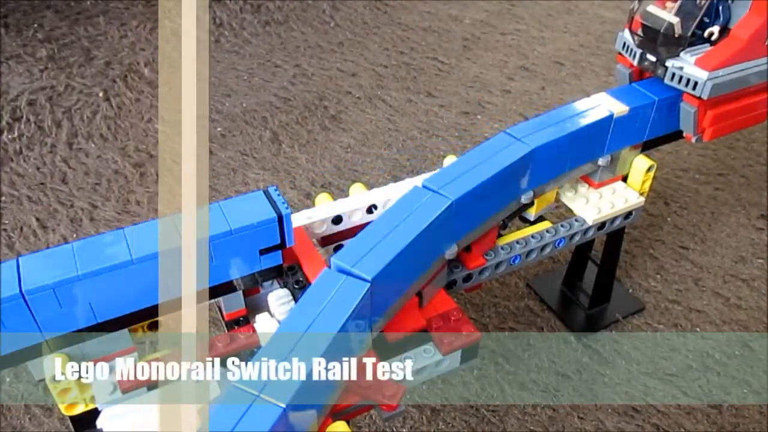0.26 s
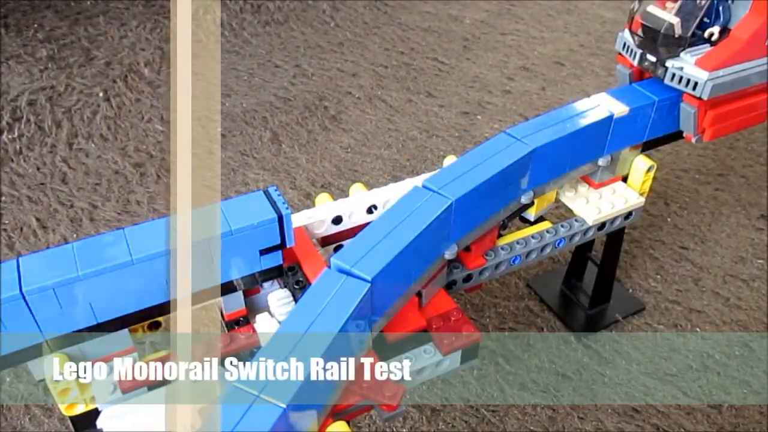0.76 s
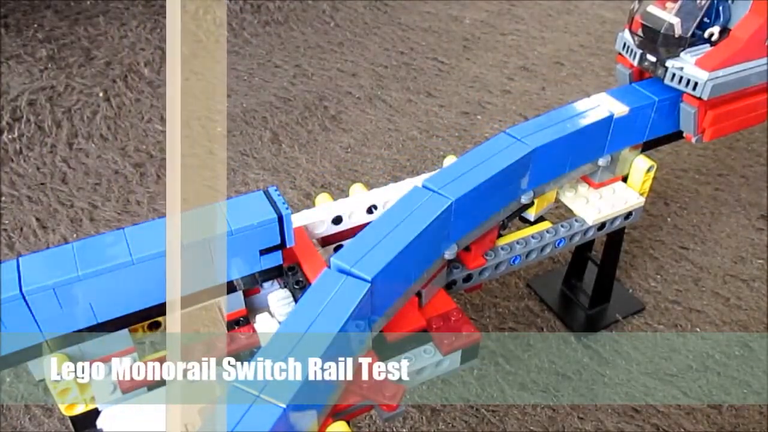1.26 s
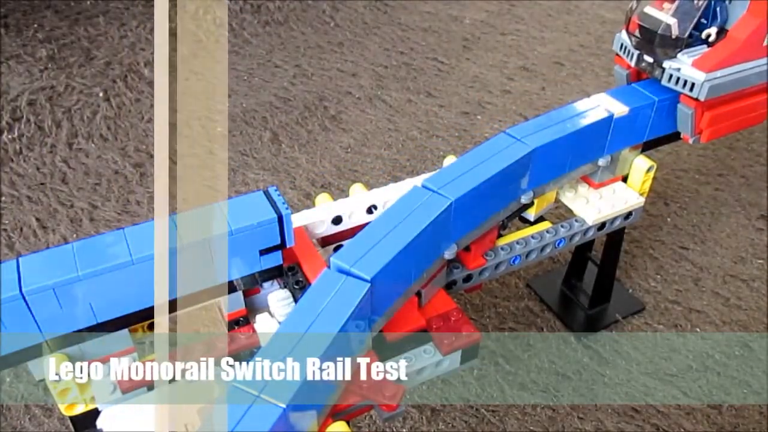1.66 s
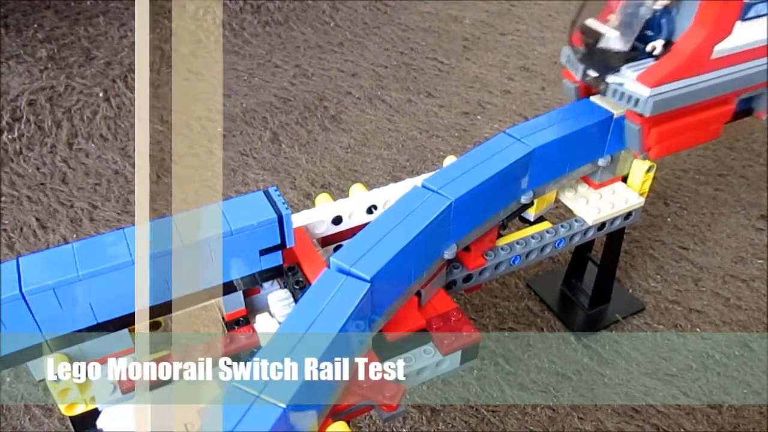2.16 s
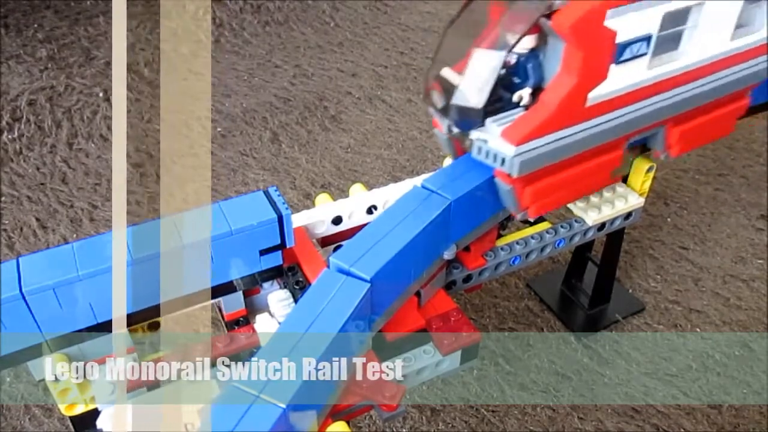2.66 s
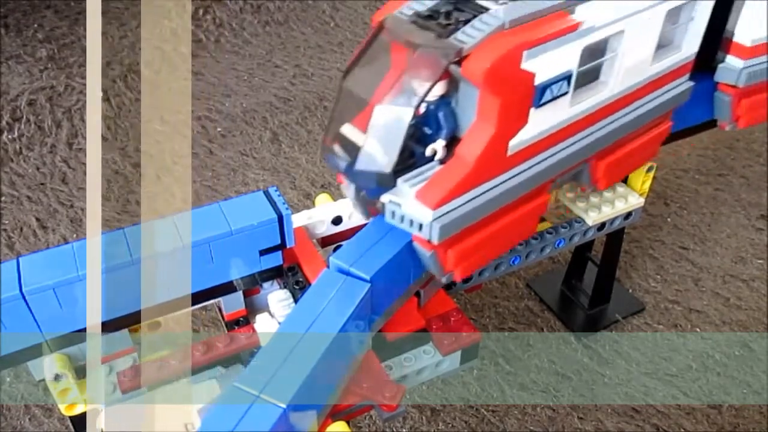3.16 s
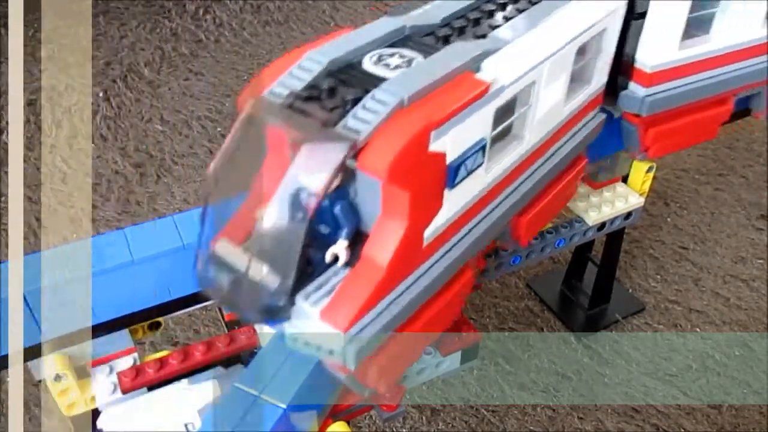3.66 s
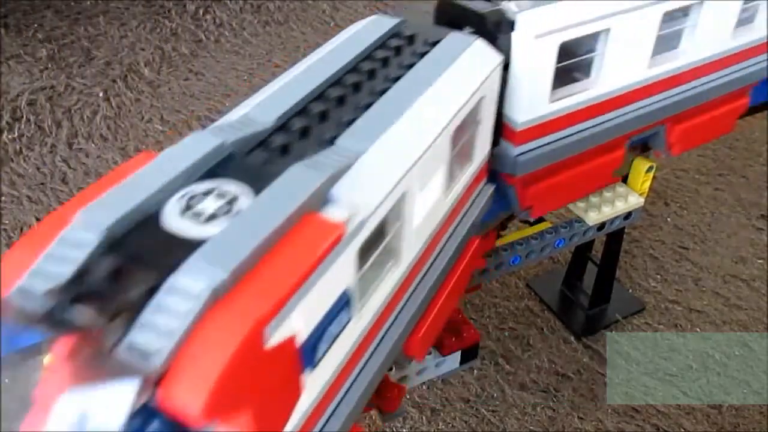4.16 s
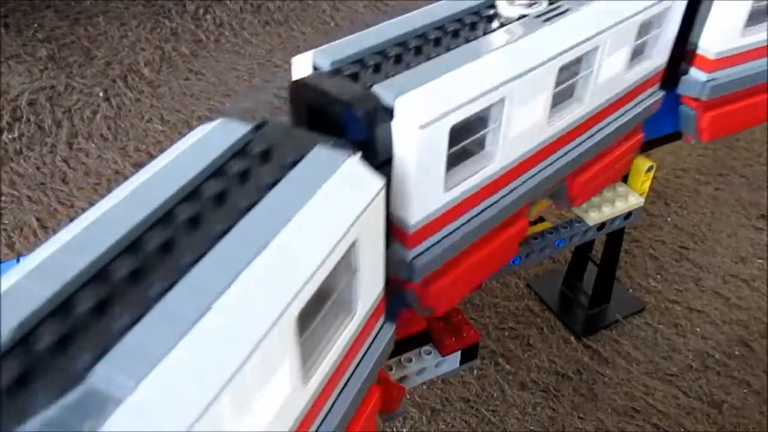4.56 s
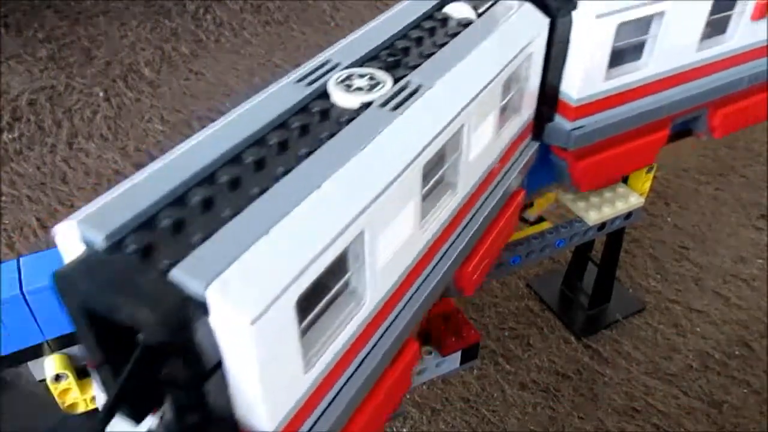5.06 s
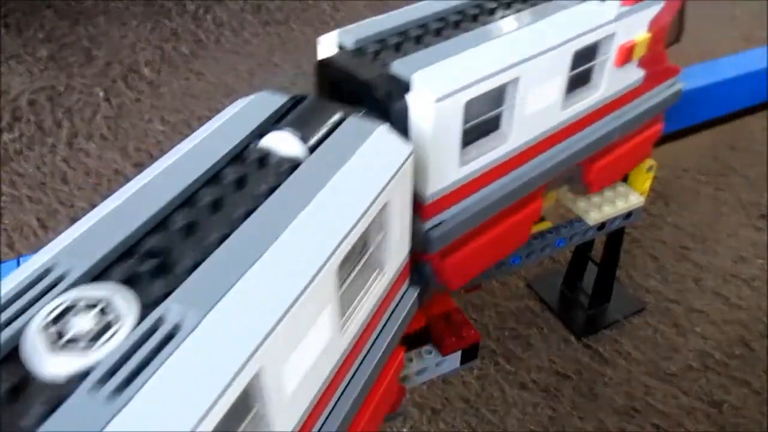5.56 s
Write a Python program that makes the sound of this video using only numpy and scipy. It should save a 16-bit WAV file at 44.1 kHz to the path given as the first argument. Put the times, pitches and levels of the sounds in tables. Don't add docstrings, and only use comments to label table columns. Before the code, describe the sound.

Brief whirring rundown and ticking gear teeth, near silence, then a plastic toy train strains, whines and rattles along a toothed track indoors.

```python
import sys
import numpy as np
from scipy import signal
from scipy.io import wavfile
from scipy.ndimage import map_coordinates

SR = 44100
rng = np.random.default_rng(int(sys.argv[2]) if len(sys.argv) > 2 else 0)


def volts_from_db(level):
    exponent = np.asarray(level, float) / 20
    return 10 ** exponent


def transcribe(u):
    v = np.clip(np.atleast_2d(u).T, -1, 1)
    q = np.round(v * 32767).astype(np.int16)
    wavfile.write(sys.argv[1], SR, q)


N = 256220


def rms_one(x):
    return x / np.sqrt(np.mean(x ** 2) + 1e-20)


def in_time(rows):
    s, *columns = np.transpose(rows)
    t = np.arange(N) / SR
    gate = np.interp(t, [s[0] - .004, s[0], s[-1], s[-1] + .02], [0, 1, 1, 0])
    return [np.interp(t, s, column) for column in columns] + [gate]


def at_hz(points, hz):
    points = np.array(points)
    return np.interp(np.log(hz), np.log(points[:, 0] + 1), points[:, 1])


def drift(rate):
    r = np.exp(-80 * np.pi * rate / SR)
    slow = signal.lfilter([1], [1, -2 * r, r * r], rng.standard_normal(N // 40 + 2002))[2000:]
    return np.interp(np.arange(N) / 40, np.arange(len(slow)), rms_one(slow))


def resonate(x, hz, width_hz):
    r = np.exp(-np.pi * width_hz / SR)
    poles = [1, -2 * r * np.cos(2 * np.pi * hz / SR), r * r]
    return signal.lfilter([(1 - r * r) / 2, 0, (r * r - 1) / 2], poles, x)


def contacts(per_s, spread_db, fade_s, slide):
    sizes = volts_from_db(spread_db * np.minimum(rng.exponential(1, N), 4))
    sizes = sizes * (rng.random(N) < per_s / SR)
    bursts = signal.lfilter([1], [1, -np.exp(-1 / (fade_s * SR))], sizes + 1e-18)
    return rng.standard_normal((2, 2, N)) * (rms_one(bursts) + slide)


def coloured(noises, spectrum, likeness, patchy_db):
    low_hz, high_hz = spectrum[0][0], spectrum[-1][0]
    edges = low_hz * 2 ** np.arange(0, np.log2(high_hz / low_hz) + .3, 1 / 3)
    out = 0
    for k, (low, high) in enumerate(zip(edges, edges[1:])):
        band = signal.butter(2, [low, high], "band", fs=SR, output="sos")
        mid, side = signal.sosfilt(band, noises[k % 2])
        hz = np.sqrt(low * high)
        alike = np.clip(at_hz(likeness, hz), -1, 1)
        gain = volts_from_db(at_hz(spectrum, hz) + patchy_db * drift(6.8)[:len(mid)])
        out = out + gain * (np.sqrt(1 + alike) * mid + np.sqrt(1 - alike) * side * [[1], [-1]])
    return rms_one(out)


def placed(pair, pan_db, lag_per_db):
    late = map_coordinates(pair[0], [np.arange(N) + lag_per_db * pan_db], order=3)
    return np.array([late * volts_from_db(pan_db / 2), pair[1] * volts_from_db(-pan_db / 2)])


# start in seconds, drumming level in dB, slack of the couplings in dB, left-right in dB.
TRAIN = [(1.46, -58, 2, -4.5), (1.53, -54, -2, -4.5), (1.6, -64, 7, -4), (1.7, -63, 7, -4.5),
         (1.76, -53, -1.5, -4.5), (1.92, -51.5, -4.5, -4), (2.026, -45, -2, -4.5), (2.22, -43, 1.5, -4),
         (2.57, -40.5, 0, -3.5), (2.9, -45.5, 0.5, -3.5), (3.1, -41.5, -1.5, -3), (3.56, -40, -0.5, -2),
         (4.05, -37, 2, -2), (4.32, -34.5, 2, 0), (4.67, -34.5, -3, .5), (4.91, -35, -2.5, .5),
         (5.3, -34.5, 1.5, 0), (5.81, -33, 3, .5)]
# start in seconds, level in dB.
FRAME_SWELLS = [(2.0, 0), (2.25, 2), (2.55, -1), (2.8, 2), (3.0, -1), (3.15, 1.5), (3.4, -3.5), (3.6, -1),
                (3.8, 1)]
# frequency in Hz, level in dB per Hz.
BODY = [(590, -60), (1000, -41), (1090, -29), (1150, -7.5), (1310, 3), (2030, -12), (2280, -1), (3000, -34),
        (3900, -52), (6600, -120)]
FRAME = [(180, -37), (300, -10.5), (494, 2.5), (690, -1), (795, -1), (1050, -1), (1360, -30), (2310, -120)]
RATTLE = [(1530, -7), (2600, -14.5), (2850, -6), (4730, -6.5), (5460, -1.5), (6910, -4.5), (7800, -10),
          (8540, -9), (10600, -18), (13400, -9), (15900, -36)]
RUMBLE = [(12, -41), (20, -8.5), (69, 0), (167, -8.5), (199, -15.5), (238, -2.5), (277, -12.5), (330, -9.5),
          (430, -40), (730, -120)]
# frequency in Hz, width in Hz, level in dB.
BODY_MODES = [(1215, 45, -2), (1270, 42, 0), (1335, 45, 0), (1400, 45, -1), (1470, 55, -4), (1545, 55, -7),
              (1740, 60, -11), (1900, 60, -10), (2190, 110, -9)]
# frequency in Hz, correlation from -1 to 1.
LIKENESS = [(40, 0.61), (100, 0.86), (300, 0.87), (1200, 0.74), (3000, 0.06), (7000, 0.33), (15000, 0.2)]
ROOF_PASSES_S = [3.3, 3.9, 4.4, 4.7]
GETS_GOING_S = [1.85, 2.18]


def train():
    t = np.arange(N) / SR
    body_db, slack_db, pan_db, on = in_time(TRAIN)
    swing_db = body_db + 40
    standing = np.interp(t, GETS_GOING_S, [1, 0])
    frame_db = -53.5 + 1.33 * swing_db - 2 * standing + in_time(FRAME_SWELLS)[0]
    rattle_db = -44 + swing_db - 2.5 * standing + slack_db
    rumble_db = -61 + .92 * swing_db - 14 * standing

    teeth = contacts(520 * volts_from_db(.8 * drift(9)), spread_db=.5, fade_s=.0009, slide=1.5)
    shells = sum(volts_from_db(db + 3.3 * drift(2.5)) * resonate(teeth[0, 0], hz, width_hz)
                 for hz, width_hz, db in BODY_MODES)
    body = coloured(teeth, BODY, LIKENESS, patchy_db=.6) + volts_from_db(1.0) * rms_one(shells)
    body = signal.sosfilt(signal.butter(4, 1080, "high", fs=SR, output="sos"), body)
    covered = np.interp(t, [2.8, 4.6, 5.3], [.15, -.15, -.55])
    body = body + covered * resonate(body, 1810, 600)
    roof = np.interp(t, ROOF_PASSES_S, [.055, .73, .62, 0])
    body = body + roof * resonate(body, 2170, 110)

    scrape = rng.standard_normal((2, 2, N)) + .42 * teeth
    frame = coloured(scrape, FRAME, LIKENESS, patchy_db=2.5)
    loose = contacts(260 * volts_from_db(2.5 * drift(12)), spread_db=1.2, fade_s=.0012, slide=2.4)
    rattle = coloured(loose * volts_from_db(1.6 * drift(7)), RATTLE, LIKENESS, patchy_db=2.0)
    axles = contacts(90, spread_db=2.5, fade_s=.002, slide=.2)[0]
    rattle = rattle + .25 * rms_one(resonate(axles, 5800, 1000))
    rumble = coloured(rng.standard_normal((2, 2, N)), RUMBLE, LIKENESS, patchy_db=1.5)

    lean_db = np.array([[.5], [-.5]])
    sound = volts_from_db(body_db - 2.4 - lean_db) * body + volts_from_db(frame_db) * frame
    sound = sound + volts_from_db(rattle_db + lean_db) * rattle + volts_from_db(rumble_db - 3 * lean_db) * rumble
    return placed(on * sound + mesh(), pan_db, lag_per_db=.75) + whine(swing_db, pan_db, on)


# start in seconds, length in seconds, first and second partial in dB.
STRAINS = [
    (1.458, .045, -54, -45),
    (1.526, 0.048, -48, -45),
    (1.575, .045, -47, -51),
    (1.61, .115, -48, -54),
    (1.755, .028, -48.5, -54),
    (1.787, .09, -47, -57),
    (1.87, .3, -47.5, -70),
]
WHINE_IDLE_DB = [-57, -68, -69]
WHINE_ROLL_DB = [-47, -55, -67]


def whine(swing_db, pan_db, on):
    pulse_hz = 1168.6
    t = np.arange(N) / SR
    rolling = np.interp(t, [1.8, 2.4], [.15, 1])
    speed = np.interp(t, GETS_GOING_S, [0, 1])
    gains = [volts_from_db((1 - speed) * idle_db + speed * (roll_db + .3 * swing_db))
             for idle_db, roll_db in zip(WHINE_IDLE_DB, WHINE_ROLL_DB)]
    for s, length_s, *jerk_db in STRAINS:
        swell = np.sin(np.pi * np.clip((t - s) / length_s, 0, 1))
        gains[:2] = [np.maximum(gain, volts_from_db(db) * swell) for gain, db in zip(gains, jerk_db)]
    turn = 2 * np.pi * pulse_hz * t
    sway = .55 * rolling * drift(9)
    tone = 0
    for k, gain in enumerate(gains):
        flutter_db = 3.0 + rolling * (2.5 * drift(7) - 4.5) + 1.5 * k * drift(20)
        phase = (k + 1) * (turn + sway / 2) + sway / 2 + k
        tone = tone + gain * volts_from_db(flutter_db) * np.sin(phase)
    return placed([on * tone] * 2, pan_db, lag_per_db=.6)


# start in seconds, frequency in Hz, level in dB.
MESH = [(2.0, 1280, -58), (2.22, 1300, -46), (2.45, 1302, -44), (2.68, 1298, -45), (2.78, 1250, -52),
        (2.93, 1262, -46), (3.25, 1252, -47), (3.6, 1262, -44.5), (4.0, 1300, -44), (4.3, 1335, -39),
        (4.42, 1400, -38), (4.48, 1345, -38), (4.56, 1395, -39), (4.66, 1335, -40), (4.74, 1290, -41),
        (4.88, 1345, -39), (5.3, 1350, -40.5), (5.81, 1358, -44)]
# start in seconds, length in seconds, frequency in Hz, level in dB.
HUMS = [
    (2.2, .12, 68, -57),
    (4.25, .14, 72, -54),
    (4.26, .13, 975, -47),
    (4.25, .11, 1215, -36),
    (4.4, .3, 46, -54),
    (4.70, 0.18, 240, -53),
    (5.06, .11, 245, -53),
    (5.25, .45, 72, -52),
]


def mesh():
    t = np.arange(N) / SR
    mesh_hz, level_db, on = in_time(MESH)
    rough = np.interp(t, [2.7, 3.0], [.4, 1])
    phase = 2 * np.pi * np.cumsum(mesh_hz + 8 * rough * drift(18)) / SR
    note = np.sin(phase) * on * volts_from_db(level_db + 2.5 + rough * (4 * drift(22) - 1.5))
    for s, length_s, hum_hz, db in HUMS:
        swell = np.sin(np.pi * np.clip((t - s) / length_s, 0, 1))
        note = note + volts_from_db(db) * swell * np.sin(2 * np.pi * hum_hz * t)
    return note


def hit(s, ring_hz, breadth, t60_s, noisy, rise_s=.0006):
    t = np.arange(1024) / SR
    shape = volts_from_db(-60 * t / t60_s) * (1 - np.exp(-t / rise_s)) ** 2
    shape = shape * np.cos(np.pi * t * SR / 2048)
    band = resonate(rng.standard_normal((3, 1024)), ring_hz, breadth * ring_hz)
    shared, left, right = resonate(band, ring_hz, breadth * ring_hz)
    rough = rms_one(shared + .5 * np.array([left, right]))
    wave = shape * (np.sin(2 * np.pi * ring_hz * t) + noisy * rough)
    start = round(s * SR)
    return slice(start, start + 1024), (wave / np.abs(wave).max())[:, :N - start]


# start in seconds, peak in dB, ring in Hz, left-right in dB.
JOINTS = [(1.4408, -37, 4440, -2.5), (1.4935, -34.5, 3550, -7), (1.6506, -44.5, 5800, -4),
          (2.2315, -29.5, 5460, -.5), (2.3264, -26, 6600, -2), (2.6975, -20, 4930, -3.5),
          (3.183, -26, 5360, 2), (3.6421, -26, 8700, -1), (4.2803, -11, 6900, 3), (4.3021, -23, 8300, 3),
          (4.5281, -20, 5900, 1), (4.7495, -22, 4700, -2), (4.8347, -26, 6040, -1), (5.0912, -17, 6300, 1),
          (5.2643, -18.5, 6150, -2)]
COUPLINGS = [(1.5097, -38, 5900, -4.5), (2.6556, -30, 6050, 5), (2.6844, -37, 6690, -4),
             (2.797, -32.5, 5540, 0), (3.1323, -32, 5510, -3), (3.358, -33, 5530, -2.5),
             (3.5283, -29, 5360, 1), (3.5945, -28, 5300, 0), (3.6012, -26.5, 4860, -4.5),
             (3.652, -17, 5450, -1.5), (3.7025, -27.5, 5470, -2.5), (3.76, -27, 3770, -.5),
             (3.8906, -26.5, 5790, -1), (3.9603, -21, 5500, -1.5), (4.0841, -29, 3760, -1),
             (4.4418, -25.5, 5550, -4), (4.5136, -28, 5950, 0), (4.5388, -24, 6300, -2),
             (5.087, -24, 7500, 0), (4.949, -24.5, 5530, -11), (5.025, -23, 6300, -2),
             (5.0457, -27, 6560, -7), (5.2115, -22, 5660, -10), (5.2274, -27, 5800, -.5),
             (5.3901, -23, 7000, -1.5), (5.4144, -19, 7600, -8), (5.5266, -21.5, 5460, -3),
             (5.554, -25, 5700, -.5), (5.6494, -23.5, 5800, -4), (5.7054, -24, 6430, 6),
             (5.783, -21, 4640, -2)]
TICKS = [(2.5361, -34, 5400, -3.5), (2.9307, -37, 5390, -3.5), (3.458, -33, 4410, -2.5),
         (3.7419, -27, 5900, -2.0), (3.8631, -30, 6260, -1.5), (4.2044, -28, 5390, -1.0),
         (4.2517, -27, 5910, 4.5), (4.3134, -27, 5360, 1.0), (4.4504, -25, 7400, -0.5),
         (4.5554, -26, 5420, -0.5), (4.5774, -25, 5370, -0.5), (4.792, -30, 6560, -0.5),
         (4.9187, -27, 5850, -1.0), (5.1178, -28, 5710, -0.5), (5.1412, -29, 5640, 0.0),
         (5.1911, -23, 5360, -2.0), (5.2354, -26, 5810, 1.5), (5.3114, -28, 5630, -0.5),
         (5.3244, -25, 6220, -1.5), (5.3604, -25, 5080, 0.0), (5.3804, -24, 7200, 0.0),
         (5.4695, -26, 6190, 0.5), (5.5794, -24, 5660, 0.0)]


def clacks():
    out = np.zeros((2, N))
    quieter_ticks = np.add(TICKS, [0, -3, 0, 0])
    kinds = [(JOINTS, -16, -14), (COUPLINGS, -15, -25), (quieter_ticks, -16, -24)]
    for rows, upper_db, top_db in kinds:
        for s, db, hz, pan_db in rows:
            sides = volts_from_db(db + np.array([[pan_db], [-pan_db]]) / 2)
            parts = [(hz, .3, -3), (6000, .6, -5), (3000, .6, -12.5),
                     (8700, .2, upper_db), (12800, .6, top_db)]
            for ring_hz, breadth, part_db in parts:
                where, wave = hit(s, ring_hz, breadth, t60_s=.016, noisy=2.2, rise_s=.0012)
                out[:, where] += sides * volts_from_db(part_db) * wave
    return out


# start in seconds, peak in dB, ring in Hz.
KNOCKS = [(1.495, -36.5, 1780), (1.5112, -30, 1540), (1.6516, -42, 1940), (1.732, -47, 1410),
          (1.7412, -41, 1350), (1.7667, -41, 1270), (1.8083, -39, 1860), (1.879, -47, 3480),
          (2.216, -34, 1390), (2.7018, -27, 1400), (3.529, -25, 1320), (3.653, -26, 1250),
          (3.767, -25, 1430), (3.9606, -19.5, 1400), (4.2696, -31, 1255), (4.31, -20, 1315),
          (4.327, -27, 1370), (4.7503, -31, 1360), (4.8365, -22, 1280), (4.913, -27, 1265),
          (5.007, -24, 1310), (5.093, -23.5, 1760), (5.14, -20.5, 1285), (5.2647, -28, 1360),
          (5.2928, -22, 1340), (5.488, -25, 1280)]
THUDS = [
    (1.282, -54, 820),
    (1.445, -32, 760),
    (1.51, -48, 635),
    (1.78, -46, 820),
    (1.949, -52, 730),
    (2.693, -52, 910),
    (4.749, -46, 850),
    (5.095, -33, 895),
    (5.192, -40, 700),
]
BUMPS = [(2.1994, -30, 1300), (2.3406, -30, 1330), (2.3795, -29, 1380), (2.397, -31, 1300),
         (2.4224, -31, 1440), (2.5835, -30, 1310), (2.6264, -30, 1300), (2.6748, -29, 1300),
         (2.7377, -32, 1370), (2.7975, -31, 1440), (2.9831, -31, 1380), (3.0395, -30, 1250),
         (3.2964, -29, 1180), (3.3238, -30, 1270), (3.3722, -30, 1180), (3.4042, -30, 1500),
         (3.464, -29, 1170), (3.5069, -26, 1260), (3.5743, -32, 1410), (3.5932, -28, 1270),
         (3.675, -29, 1280), (3.7379, -30, 1360), (3.8911, -27, 1420), (3.93, -28, 1320),
         (4.0771, -24, 1270), (4.1195, -28, 1190), (4.1375, -28, 1340), (4.1574, -29, 1320),
         (4.1989, -25, 1360), (4.3789, -24, 1330), (4.4677, -28, 1310), (4.5181, -23, 1450),
         (4.559, -26, 1340), (4.6992, -23, 1390), (4.7164, -23, 1300), (4.776, -26, 1290),
         (4.802, -25, 1180), (4.8708, -26, 1340), (4.9766, -24, 1340), (5.0654, -27, 1350),
         (5.1741, -27, 1400), (5.1976, -25, 1250), (5.3637, -26, 1360), (5.4221, -27, 1350),
         (5.4625, -27, 1360), (5.5059, -24, 1350), (5.6121, -27, 1380), (5.6291, -26, 1370),
         (5.6555, -26, 1180), (5.695, -23, 1450), (5.7244, -27, 1370)]
CHATTER = [(1.8493, -41, 1270), (1.8802, -41, 1380), (1.8942, -38, 1360), (1.9426, -44, 1260),
           (1.9476, -39, 1350), (1.962, -38, 1460), (1.969, -38, 1260), (1.997, -37, 1400),
           (2.0438, -36, 1440), (2.0623, -36, 1260), (2.0877, -35, 1850), (2.1052, -33, 1420),
           (2.1316, -35, 1490), (2.1491, -34, 1420), (2.194, -30, 1310)]


def knocks():
    out = np.zeros((2, N))
    for rows, offset_db in [(KNOCKS, 0), (THUDS, 0), (BUMPS, -5), (CHATTER, -8)]:
        for s, db, hz in rows:
            where, wave = hit(s, hz, breadth=.45, t60_s=.026, noisy=.4)
            out[:, where] += volts_from_db(db + offset_db + 1.0 + np.array([[-1.5], [1.5]])) * wave
    return out


# start in seconds, peak in dB, low note in dB.
SNAPS = [
    (1.568, -25.5, -15),
    (1.6964, -26, -20),
    (1.8166, -25.5, -18.5),
    (3.058, -27.5, -33),
    (3.6275, -28, -19),
]
# frequency in Hz, level in dB, t60 in seconds.
SNAP_MODES = [(4560, -3, 0.0076), (4920, -6, 0.0071), (6820, -10, 0.0088), (2810, -15, 0.01),
              (8730, -18, 0.011), (10200, -35, 0.0063), (11800, -21.5, .010), (14000, -26, .008),
              (9500, -16, .002)]
# delay in seconds, level in dB.
SNAP_ECHOES = [
    (0.0132, -27),
    (0.0268, -14),
]


def snaps():
    out = np.zeros((2, N))
    for s, db, low_db in SNAPS:
        for delay_s, echo_db in [(.0017, 0)] + SNAP_ECHOES:
            for hz, mode_db, t60_s in SNAP_MODES + [(780, low_db, .013)]:
                where, wave = hit(s + delay_s, hz, breadth=.16, t60_s=t60_s, noisy=.2)
                out[:, where] += volts_from_db(db + echo_db + mode_db + np.array([[-2.5], [2.5]])) * wave
    return out


# start in seconds, level in dB, tooth
FIRST_MOTOR = [(0.0, -27.5, 1500), (0.094, -27.5, 1750), (0.162, -35.5, 1800), (0.252, -70, 2000),
               (0.27, -63, 2800)]
# frequency in Hz, level in dB per Hz.
FIRST_MOTOR_COLOUR = [(240, -93), (400, -41), (718, -14), (918, -31), (1010, -5), (1270, -17), (1860, -7),
                      (2650, -12.5), (2910, -4.5), (4340, -8.5), (4760, -1), (7670, -4.5), (15800, -6)]
# frequency in Hz, width in Hz, level in dB.
FIRST_MOTOR_MODES = [(1880, 53, -2), (1010, 60, -10), (2930, 60, -6), (4730, 58, 2), (5350, 52, 0),
                     (6690, 50, -1), (8100, 190.8, -15)]
# start in seconds, peak in dB.
LAST_TEETH = [
    (0.1934, -36),
    (0.2074, -42),
    (0.2164, -41),
    (0.2294, -46),
    (0.2564, -54),
]


def first_motor():
    level_db, per_s, on = in_time(FIRST_MOTOR)
    teeth = contacts(per_s, spread_db=1.2, fade_s=.0004, slide=1.8)[..., :SR // 2]
    gears = coloured(teeth, FIRST_MOTOR_COLOUR, LIKENESS, patchy_db=0.0)
    housing = sum(volts_from_db(db) * resonate(teeth[0], hz, width_hz) for hz, width_hz, db in FIRST_MOTOR_MODES)
    thrum = volts_from_db(-33) * rms_one(resonate(teeth[1], 120, 110))
    motor = gears + thrum + volts_from_db(-8.5) * rms_one(housing)
    motor = np.pad(motor, [(0, 0), (0, N - SR // 2)])
    ticks = np.full(N, 1e-18)
    for s, db in LAST_TEETH:
        ticks[round(s * SR)] += volts_from_db(db + 8.0)
    ticks = resonate(ticks, 6890, 900) * 4.4 + resonate(ticks, 12500, 5000)
    sound = on * volts_from_db(level_db) * motor + ticks
    top = signal.sosfilt(signal.butter(1, 3500, "high", fs=SR, output="sos"), sound)
    return placed(sound + top * [[.3], [-.3]], np.full(N, .8), lag_per_db=3.0)


def echoes(x):
    t = np.arange(SR // 4) / SR
    t60_s = .065
    tail = rng.standard_normal((2, len(t))) * volts_from_db(-60 * t / t60_s) * (t > .004)
    return signal.fftconvolve(x, tail / np.sqrt(np.sum(tail ** 2) / 2), axes=1)[:, :N]


# frequency in Hz, level in dB per Hz.
ROOM = [(12, -39), (20, -4.5), (247, -4.5), (326, -8), (496, -3), (539, -8.5), (969, -9), (1050, -10.5),
        (1430, -12.5), (2060, -21), (4500, -22), (5620, -20), (15800, -26.5)]
# frequency in Hz, correlation from -1 to 1.
ROOM_LIKENESS = [(60, -0.44), (380, -0.27), (2380, 0.18), (15000, -0.041)]


def room():
    return volts_from_db(-58.5) * coloured(rng.standard_normal((2, 2, N)), ROOM, ROOM_LIKENESS, patchy_db=.3)


def scene():
    hits = clacks() + snaps() + knocks()
    return train() + hits + first_motor() + volts_from_db(-9.0) * echoes(hits) + room()


def low_pass(x):
    return signal.sosfilt(signal.butter(12, 17000, fs=SR, output="sos"), x)


def record(dry):
    notched = dry - .8 * resonate(dry, 7880, 150)
    top_cut = signal.ellip(10, .5, 75, 15800, fs=SR, output="sos")
    return low_pass(signal.sosfilt(top_cut, notched))


dry = scene()
out = record(dry)
transcribe(out)
```